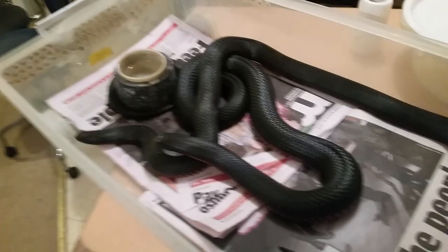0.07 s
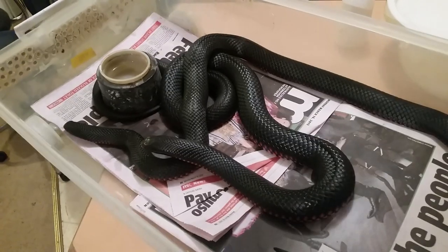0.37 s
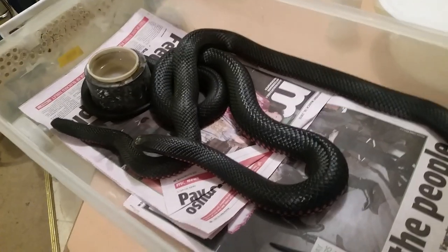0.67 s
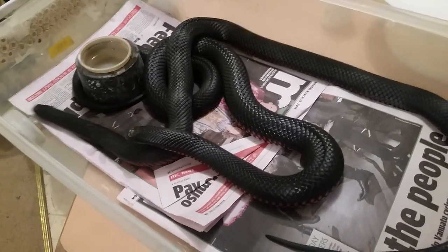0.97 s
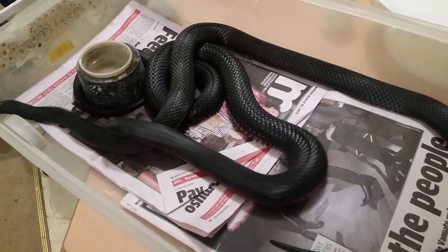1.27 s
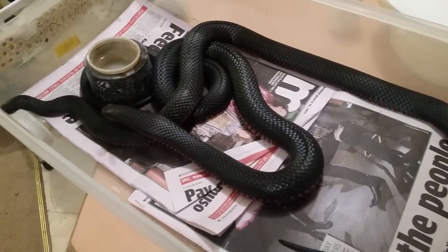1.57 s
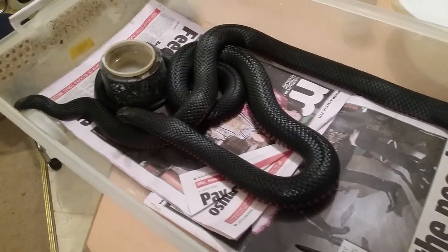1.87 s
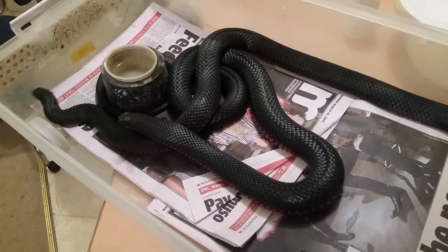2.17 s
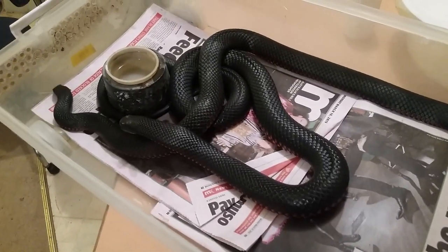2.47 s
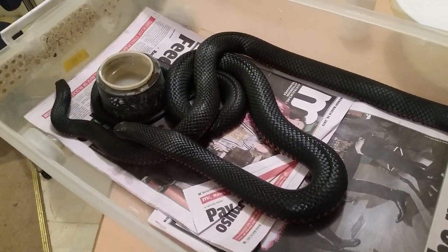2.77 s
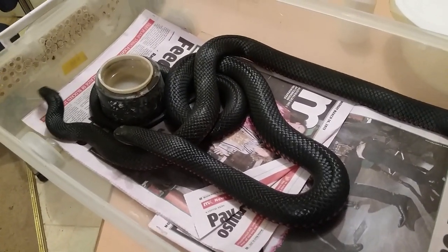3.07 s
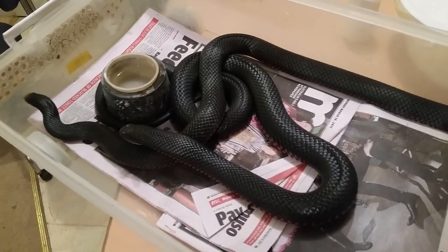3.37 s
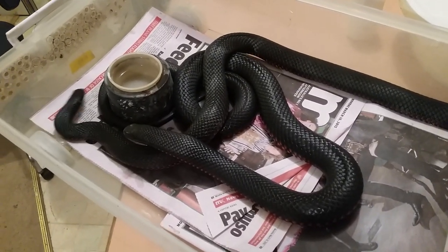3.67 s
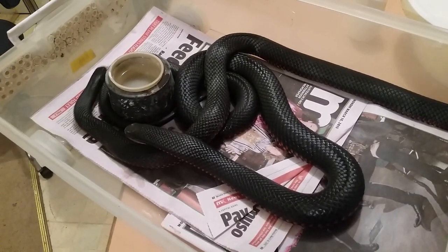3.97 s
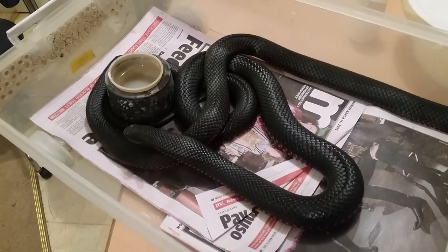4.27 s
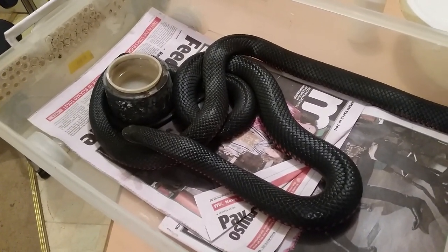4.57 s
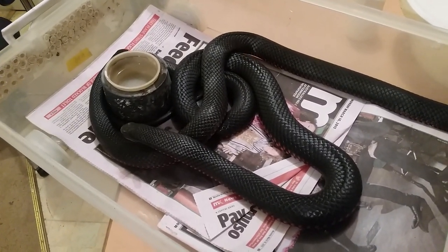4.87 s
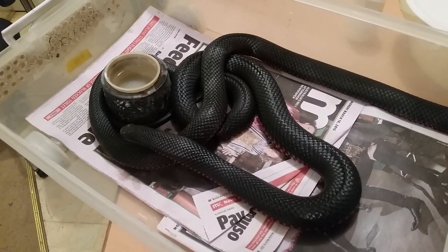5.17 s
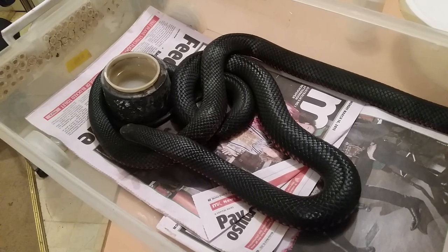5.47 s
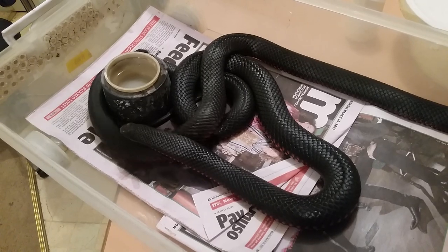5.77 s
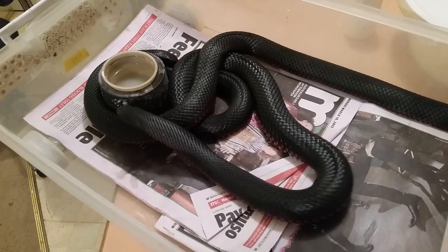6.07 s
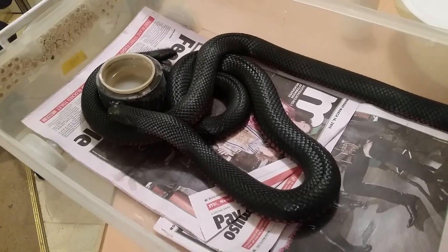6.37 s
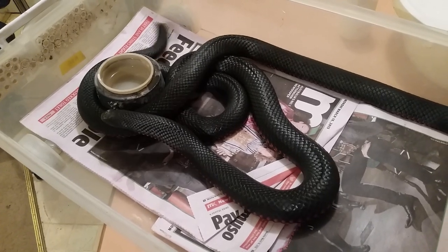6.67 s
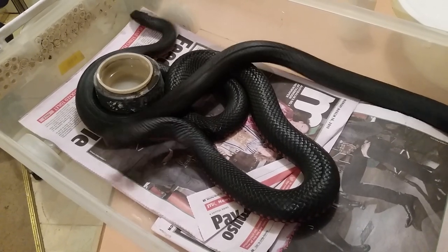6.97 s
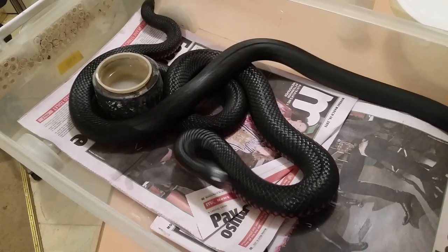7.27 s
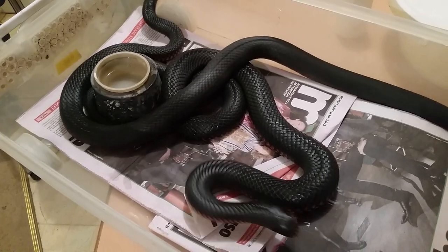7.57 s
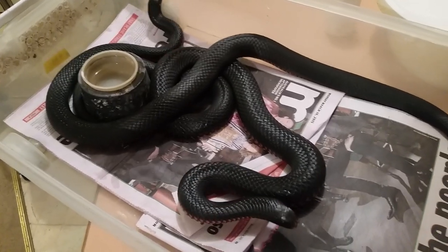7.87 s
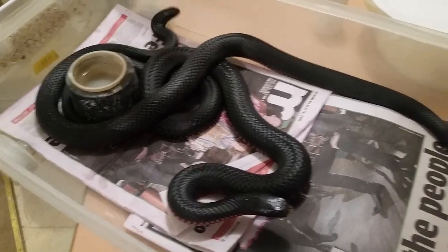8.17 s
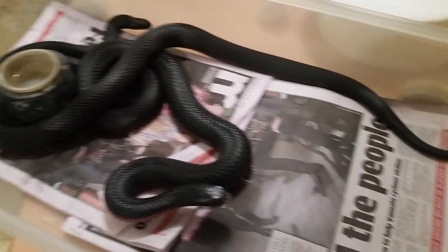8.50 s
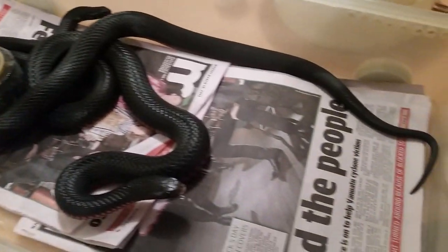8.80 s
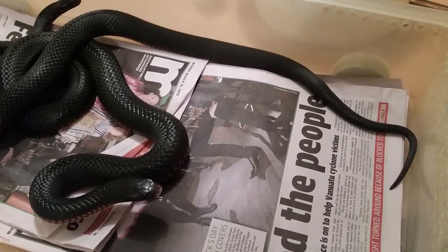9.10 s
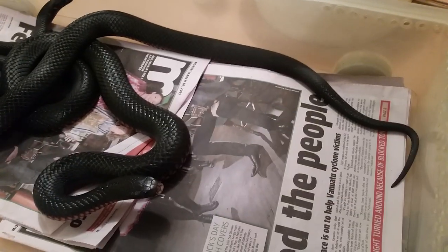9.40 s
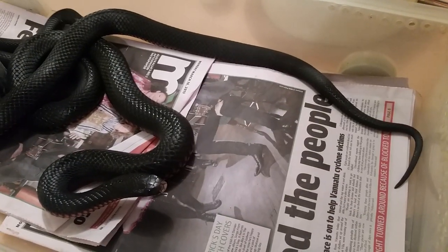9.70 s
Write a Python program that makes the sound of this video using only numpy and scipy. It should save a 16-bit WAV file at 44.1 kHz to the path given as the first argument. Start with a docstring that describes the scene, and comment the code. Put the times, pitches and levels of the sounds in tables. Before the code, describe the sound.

Low, pulsing room hum and microphone hiss, with scales rustling on paper, soft thumps and a sharp snap as snakes move in a plastic tub.

```python
"""A quiet room where motors hum and beat: two large snakes slide over newspaper in a plastic tub.
Scales hiss and squeak on the paper. Coils bump the tub, once with a hollow knock. The paper gives
one sharp snap and a few faint ones. The sound fades in as a hand shifts on the camera.
Microphone hiss sits mostly left; a noise suppressor passes more hiss and air while the snakes slide."""
import sys
import numpy as np
from scipy import signal
from scipy.fft import rfft, irfft, next_fast_len
from scipy.io import wavfile
from scipy.ndimage import uniform_filter1d, map_coordinates

SR = 44100
rng = np.random.default_rng(int(sys.argv[2]) if len(sys.argv) > 2 else 0)


def wav_record(signal):
    """Record a signal, one row per channel, as 16-bit PCM in the file named by sys.argv[1]."""
    frames = np.transpose(np.atleast_2d(signal))
    bounded = np.clip(frames, -1, 1)
    # unit amplitude maps onto the largest positive 16-bit level
    quanta = np.round(bounded * 32767).astype(np.int16)
    wavfile.write(sys.argv[1], SR, quanta)


N = 438354
T = np.arange(N) / SR

# Table levels are relative; the functions add their own gains.
# strongest motor line: t/s, level/dB
DRONE_LEVELS = [(1.2, -55.5), (1.49, -52), (1.85, -58.5), (2.31, -55.5), (2.72, -60), (2.99, -55),
                (3.52, -59), (4.54, -58.5), (4.78, -52.5), (5.27, -60), (6.0, -56.5), (6.29, -58.5),
                (6.89, -54), (7.6, -56.5), (9.03, -60), (9.24, -55.5), (9.63, -62.5), (9.9, -62)]
# hum lines: f/Hz, level/dB, left-right phase/rad
HUM_LINES = [(48.7, -10.5, 1.2), (311.7, -5.5, 0.69), (465.7, -14, 0), (528, -17, -0.5), (589, -18.5, 1.1),
             (621, -20.5, 0)]
# room air: f/Hz, density/dB
AIR_SPECTRUM = [(20, -2), (42, 3), (70, 0), (130, -3), (195, 1), (250, -0.5), (320, -7.5), (400, -10.5),
                (480, -6), (600, -12), (750, -16.5), (1100, -23.5), (2200, -45.5), (5000, -57.5)]
# room air: f/Hz, left-right correlation
AIR_CORRELATION = [(40, -0.078), (70, 0.26), (130, 0.48), (250, 0.8), (600, 0.31), (1400, -0.35)]
# microphone hiss: f/Hz, left density/dB, right density/dB
HISS_SPECTRA = [(1000, -19, -23), (1880, -19.5, -21), (2270, -23.5, -22.5), (2840, -16.5, -24.5),
                (3200, -12.5, -17), (3300, -2.5, -23), (3480, 2, -14), (3940, -3.5, -19.5), (4397, -7, -19),
                (4686, -19.5, -26), (5080, -48.5, -43.5), (10600, -50.5, -52), (11840, -33, -36),
                (15400, -28, -28.5)]
# hand shifts: t/s, level/dB, tap re level/dB
HAND_SHIFTS = [(0.737, -41.5, -30), (0.8438, -30, -25.5), (0.8598, -27, -33), (1.083, -30, -19),
               (1.5768, -24.5, -23.5), (9.365, -38, -35)]
# camera body: f/Hz, level/dB, t60/s
CAMERA_MODES = [(62, -2.5, 0.081), (100, -1, 0.059), (165, -1, 0.033)]
# sliding strokes: fastest t/s, level/dB, rise/s, fall/s
SLIDE_STROKES = [(1.45, -69, 0.125, 0.19), (3.48, -86, 0.16, 0.22), (6.27, -76, 0.16, 0.11),
                 (6.66, -82, 0.06, 0.08), (6.885, -70, 0.022, 0.04), (7.01, -68.5, 0.07, 0.15),
                 (7.232, -66, 0.016, 0.022), (7.295, -64, 0.018, 0.046), (7.42, -61, 0.06, 0.1),
                 (7.525, -53.5, 0.025, 0.067), (7.77, -68, 0.08, 0.15), (8.29, -83, 0.06, 0.1)]
# dry scrape of scales: f/Hz, density/dB
SCRAPE_SPECTRUM = [(500, -14), (1000, -8.5), (2600, -10), (4200, -5), (5200, -16), (7900, -19),
                   (9300, -12.5), (10800, -7), (12000, -2.5), (15500, 1)]
# sheet rustle: f/Hz, density/dB
SHEET_SPECTRUM = [(100, -8.5), (300, 1.5), (600, -2.5), (1100, -4.5), (2600, -8), (4300, -10), (5200, -33),
                  (9000, -64)]
# scale squeaks: centre t/s, length/s, f/Hz, width/Hz, level/dB
SCALE_SQUEAKS = [(1.43, .2, 9700, 1800, -78), (1.565, 0.13, 8800, 1100, -78.5),
                 (3.48, .2, 9000, 1200, -93.5), (3.76, .12, 9300, 900, -97),
                 (6.868, 0.067, 9750, 900, -78.5), (7.007, .12, 10000, 1400, -87.5),
                 (7.235, 0.044, 11400, 2500, -71), (7.32, .06, 2750, 60, -69.5),
                 (7.516, 0.05, 2600, 120, -66), (7.52, 0.16, 9600, 1200, -69.5)]
# coil bumps: t/s, level/dB, f/Hz, t60/s, tap re level/dB
COIL_BUMPS = [(1.285, -42.5, 171, 0.086, -8), (6.371, -44, 200, .04, -3.5), (7.793, -39, 293, 0.061, -15),
              (8.591, -56, 260, 0.036, -1)]
# paper snaps, single or in a run: t/s, body/dB, crackle/dB
PAPER_SNAPS = [(1.55, -68, -54), (2.49, -59, -74), (7.3585, -32, -39), (7.3633, -29, -51),
               (7.366, -38.5, -45.5), (7.375, -39, -48), (7.765, -53, -68), (9.7355, -66, -78.5)]
# paper on the tub floor: f/Hz, level/dB, t60/s
PAPER_MODES = [(240, -7, 0.038), (352, -1, 0.044), (564, 2.5, 0.069), (795, -7.5, 0.057),
               (1352, -2.5, 0.075), (1407, -7, 0.045), (2000, -13, 0.028), (3700, -13.5, 0.013),
               (5700, -8, .01)]
# hollow tub: f/Hz, level/dB, t60/s
TUB_MODES = [(111.7, -20, 0.3), (152, -21, 0.22), (207, -24.5, .1), (314, -11.5, 0.08),
             (356.6, -0.5, 0.061), (368.7, -11.5, 0.12), (454, -23.5, 0.15), (793, -35.5, 0.073),
             (1410, -31.5, 0.025)]
# near walls: delay/s, level/dB
WALL_ECHOES = [(0.0314, -18), (0.058, -21.5)]
# room decay: f/Hz, t60/s
ROOM_DECAY = [(150, 0.31), (1000, 0.28), (10000, 0.1)]
# soft contact: f/Hz, density/dB
TAP_SPECTRUM = [(100, -7), (450, 4.5), (800, -2), (1300, -19.5), (2200, -43), (6000, -70.5)]
# camera case: f/Hz, level/dB, t60/s
CASE_MODES = [(182, -7.5, 0.044), (60, -23, 0.19)]
# rubbing spot: t/s, left minus right/dB
SCRAPE_PAN = [(1.5, -1.5), (6.3, -3), (7.1, -3), (7.55, -6), (7.7, -1.5)]

ON_S, ATTACK_S, FULL_S = 0.36, 0.12, 1.24
DRONE_HZ, FLUTTER_HZ = 145.8, 148.55
PAIR_HZ, BEAT_HZ = 99.3, 1.371
AIR_SWELL_SHARE, HISS_SWELL_SHARE = 0.28, 0.19  # of the drone's swing in dB
HALF_OPEN_DB, OPEN_WINDOW_S, AIR_OPEN_DB, HISS_OPEN_DB = -67, 0.47, 3, 3.5  # suppressor
KNOCK_S, TOP_HZ = 6.8828, 15800


def amp(db):
    """Decibels to gain."""
    return 10 ** (np.asarray(db) / 20)


def unit(x):
    """Scale to rms 1."""
    return x / np.sqrt(np.mean(x ** 2) + 1e-20)


def along(points, hz):
    """Interpolate (f/Hz, value) points on a log axis."""
    f, v = np.transpose(points)
    return np.interp(np.log(hz + 1), np.log(f + 1), v)


def wobble(rate_hz):
    """Smooth random curve with knots at rate_hz."""
    return map_coordinates(rng.standard_normal(int(N * rate_hz / SR) + 4), [T * rate_hz])


def filtered(x, response):
    """Apply a frequency response."""
    size = next_fast_len(N + 8192)
    return irfft(rfft(x, size) * response(np.fft.rfftfreq(size, 1 / SR)), size)[..., :N]


def noise(spectrum):
    """Coloured noise, rms 1, independent channels."""
    return unit(filtered(rng.standard_normal((2, N)), lambda hz: amp(along(spectrum, hz))))


def add(track, at_s, sound):
    """Mix in a short sound."""
    part = track[..., round(at_s * SR):][..., :sound.shape[-1]]
    part += sound[..., :part.shape[-1]]


def delayed(x, delay_s):
    """Delay a mono track."""
    return np.pad(x, round(delay_s * SR))[:N]


def ring(modes, attack_s):
    """Damped modes after a contact of finite rise time."""
    t = T[:SR // 2]
    ringing = sum(amp(db - 60 * t / t60_s) * np.sin(2 * np.pi * hz * t) for hz, db, t60_s in modes)
    return (1 - np.exp(-(t / attack_s) ** 2)) * ringing


def fade_in(db_per_s):
    """Quick onset, then a steady climb to gain 1."""
    return np.clip((T - ON_S) / ATTACK_S, 0, 1) * amp(db_per_s * np.minimum(T - FULL_S, 0))


def drone_gain():
    """The strongest motor line swells and sags."""
    return amp(np.interp(T, *np.transpose(DRONE_LEVELS)))


def swell():
    """Drone gain over its median."""
    return drone_gain() / np.median(drone_gain())


def motor_line(hz, drift_rad, waver_db, spread_rad=0):
    """Motor tone, rms 1, wandering in phase and level."""
    phase = 2 * np.pi * hz * T + drift_rad * wobble(2.5)
    stereo = np.sin([phase + spread_rad / 2, phase - spread_rad / 2])
    return unit(stereo * amp(waver_db * wobble(6.7)))


def moving_air():
    """Low air noise, nearly mono in the low mids."""
    def mid_side_gains(hz):
        angle_rad = np.arccos(along(AIR_CORRELATION, hz)) / 2
        return np.array([np.cos(angle_rad), np.sin(angle_rad)])
    mid, side = filtered(noise(AIR_SPECTRUM), mid_side_gains)
    return unit(np.array([mid + side, mid - side])) * amp(3.5 + 0.46 * wobble(5))


def room_tone(opening):
    """Air and motors: two almost in step beat; a weak line just above the drone makes it flutter."""
    air = moving_air()
    # speed changes shift higher lines further
    hum = sum(amp(db) * motor_line(hz, drift_rad=0.0007 * hz, waver_db=0.9, spread_rad=rad)
              for hz, db, rad in HUM_LINES)
    lower = motor_line(PAIR_HZ - BEAT_HZ / 2, drift_rad=0.1, waver_db=0.5)
    upper = motor_line(PAIR_HZ + BEAT_HZ / 2, drift_rad=0.1, waver_db=0.5)
    drone = motor_line(DRONE_HZ, drift_rad=0.15, waver_db=0.87)
    flutter = amp(-16) * motor_line(FLUTTER_HZ, drift_rad=0.15, waver_db=-0.5)
    bed_gain = amp(-62 + AIR_OPEN_DB * opening) * swell() ** AIR_SWELL_SHARE
    bed = bed_gain * (air + hum + amp(-4) * (lower - upper))
    return fade_in(db_per_s=25.5) * (bed + amp(0.5) * drone_gain() * (drone + flutter))


def microphone_hiss(opening):
    """Independent hiss per channel, the left peaking in the upper mids, over a faint white floor."""
    f, left_db, right_db = np.transpose(HISS_SPECTRA)
    colour = lambda hz: amp([along(list(zip(f, db)), hz) for db in (left_db, right_db)])
    floor = amp(-91.5) * fade_in(db_per_s=1) * rng.standard_normal((2, N))
    hiss = unit(filtered(rng.standard_normal((2, N)), colour))
    gain = amp(-63.5 + HISS_OPEN_DB * opening) * swell() ** HISS_SWELL_SHARE
    return gain * fade_in(db_per_s=36) * hiss + floor


def tap(attack_s=0.0014, t60_s=0.042):
    """Dull noise burst of a soft contact."""
    t = T[:SR // 2]
    colour = amp(along(TAP_SPECTRUM, np.fft.rfftfreq(len(t), 1 / SR)))
    burst = unit(irfft(rfft(rng.standard_normal(len(t))) * colour, len(t)))
    return burst * amp(-60 * t / t60_s) * (1 - np.exp(-t / attack_s))


def handling():
    """The camera rocks, driving its microphones in antiphase; the case thuds in both."""
    out = np.zeros((2, N))
    rock = ring(CAMERA_MODES, attack_s=0.0025)
    for at_s, db, tap_db in HAND_SHIFTS:
        thud = ring(CASE_MODES, attack_s=0.0014) + amp(tap_db) * tap()
        add(out, at_s, amp(db) * np.array([thud - rock, thud + rock]))
    return out


def rubbing(flank_db=12):
    """Rubbing strength: each stroke speeds up and slows; overlaps add in power."""
    power = np.zeros(N)
    for peak_s, db, rise_s, fall_s in SLIDE_STROKES:
        from_peak = (T - peak_s) / np.where(T < peak_s, rise_s, fall_s)
        power += amp(db - flank_db * (np.hypot(1, from_peak) - 1)) ** 2  # rounded top
    return np.sqrt(power)


def slide():
    """Scale edges catch the paper in dense grains; the sheet rustles under the moving weight."""
    rub = rubbing()
    grain = unit(amp(1.2 * wobble(700) + 0.4 * wobble(32)))
    scrape = amp(3.5) * rub * grain * noise(SCRAPE_SPECTRUM)
    sheet = amp(-67.5) * (rub / amp(-69.5)) ** 0.61 * grain * noise(SHEET_SPECTRUM)
    pan_db = np.interp(T, *np.transpose(SCRAPE_PAN))
    return scrape * amp([pan_db / 2, -pan_db / 2]) + sheet


def squeaks():
    """Evenly spaced scales slip over an edge and sing in a narrow band."""
    out = np.zeros((2, N))
    t = T[:SR] - 0.5
    f = np.fft.rfftfreq(SR, 1 / SR)
    for centre_s, length_s, hz, width_hz, db in SCALE_SQUEAKS:
        resonance = 1 / (1 + (2 * (f - hz) / width_hz) ** 2)
        band = unit(irfft(rfft(rng.standard_normal((2, SR))) * resonance, SR))
        add(out, centre_s - 0.5, amp(db + 2) * band * np.exp(-2 * (t / length_s) ** 2))
    return out


def suppressor(x):
    """Noise suppressor opening, 0-1, from the mean power of x."""
    power = np.abs(uniform_filter1d(np.mean(x ** 2, axis=0), round(OPEN_WINDOW_S * SR)))
    return power / (power + amp(HALF_OPEN_DB) ** 2)


def bumps():
    """A soft coil gives the tub a quickly damped push and a dull tap."""
    out = np.zeros(N)
    for at_s, db, hz, t60_s, tap_db in COIL_BUMPS:
        push = ring([(hz, 2, t60_s)], attack_s=0.0013)
        add(out, at_s, amp(db) * (push + amp(tap_db) * tap()))
    return out


def room_tail(x, predelay_s=0.008):
    """Short diffuse tail, different per channel; treble dies first."""
    hz, t, frames = signal.stft(rng.standard_normal((2, SR // 2)), SR, nperseg=256)
    decay = amp(-60 * t / along(ROOM_DECAY, hz)[:, None])
    tail = signal.istft(frames * decay, SR, nperseg=256)[1]
    tail = np.pad(tail / np.linalg.norm(tail[0]), ((0, 0), (round(predelay_s * SR), 0)))
    return signal.fftconvolve(x, tail, axes=1)[:, :N]


def snaps(smack_t60_s=0.035, crackle_t60_s=0.02):
    """Paper slips free with a bright crackle and smacks the tub floor, off to the right."""
    body, smack_gain, crackle_gain = np.zeros((3, N))
    t = T[:SR // 2]
    for at_s, body_db, crackle_db in PAPER_SNAPS:
        add(body, at_s, amp(body_db - 6) * ring(PAPER_MODES, attack_s=0.00022))
        add(smack_gain, at_s, amp(body_db - 15 - 60 * t / smack_t60_s))
        add(crackle_gain, at_s, amp(crackle_db - 60 * t / crackle_t60_s))
    crackle = crackle_gain * noise(SCRAPE_SPECTRUM) * amp([[-6], [3]])
    smack = smack_gain * noise(SHEET_SPECTRUM) * amp([[-3], [1]])
    body_left = amp(-2.5) * delayed(body, delay_s=0.00028)
    return np.array([body_left, body]) + smack + crackle


def knock():
    """One dull blow rings the hollow tub."""
    out = np.zeros(N)
    add(out, KNOCK_S, amp(-13.5) * (ring(TUB_MODES, attack_s=0.0026) + amp(-31.5) * tap()))
    return out


def scene():
    """Tub contacts with echoes, slides, handling, and a background that rises with the slides."""
    contacts = bumps() + knock() * amp([[-0.5], [0.5]]) + snaps()
    walls = sum(amp(db) * delayed(contacts.mean(axis=0), delay_s) for delay_s, db in WALL_ECHOES)
    sliding = slide() + squeaks() * amp([[1.5], [-1.5]])
    opening = suppressor(sliding)
    echoes = walls + amp(-17) * room_tail(contacts)
    return contacts + echoes + sliding + handling() + room_tone(opening) + microphone_hiss(opening)


def record(dry):
    """The camera's band limit."""
    return filtered(dry, lambda hz: hz < TOP_HZ)


dry = scene()
out = record(dry)
wav_record(out)
```